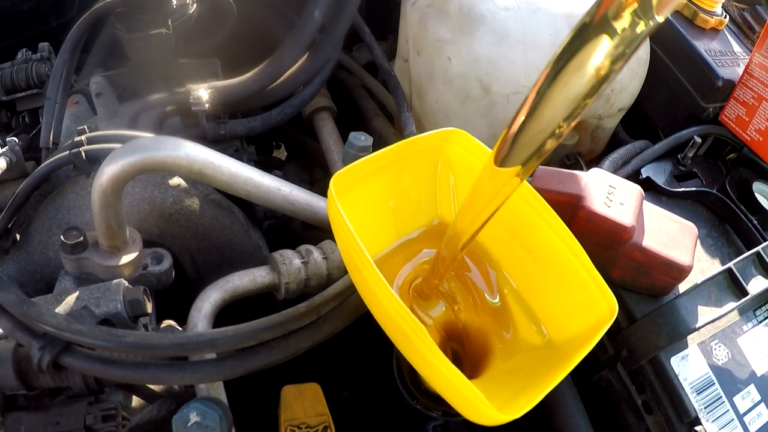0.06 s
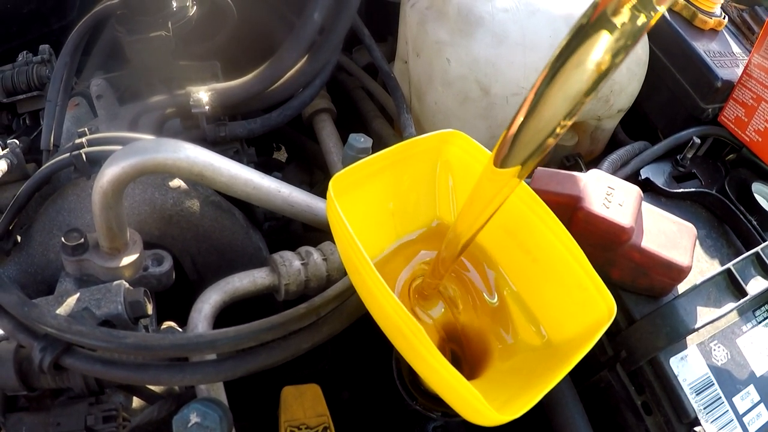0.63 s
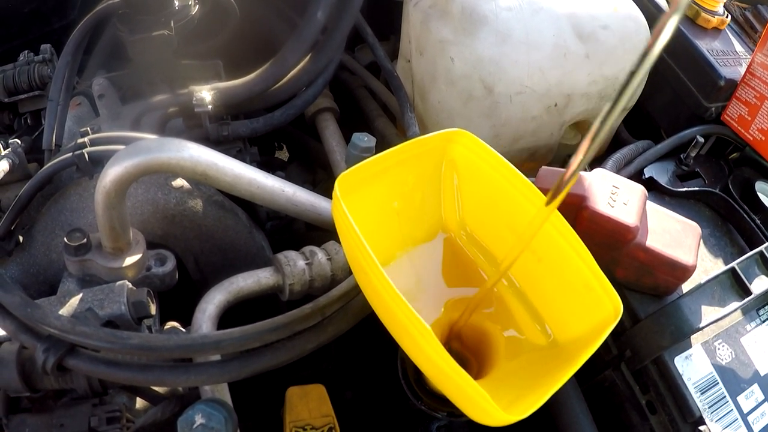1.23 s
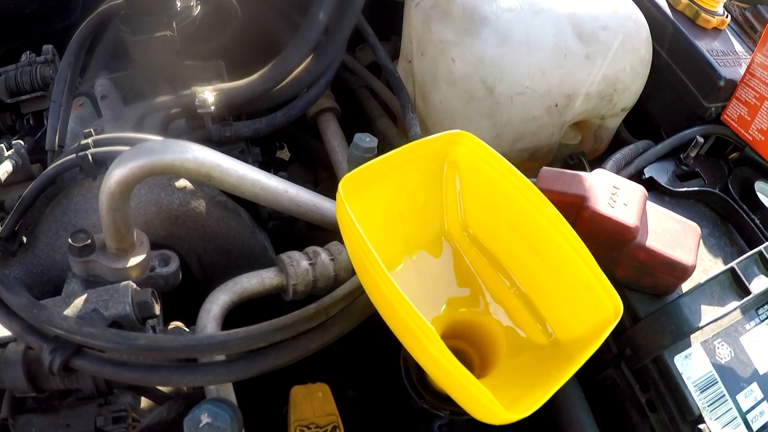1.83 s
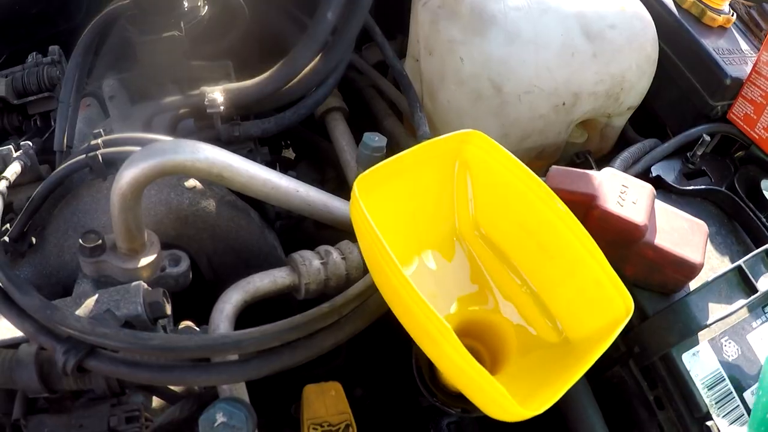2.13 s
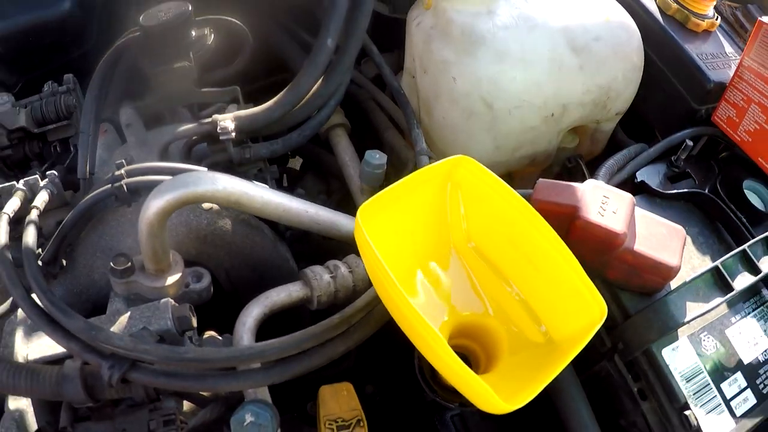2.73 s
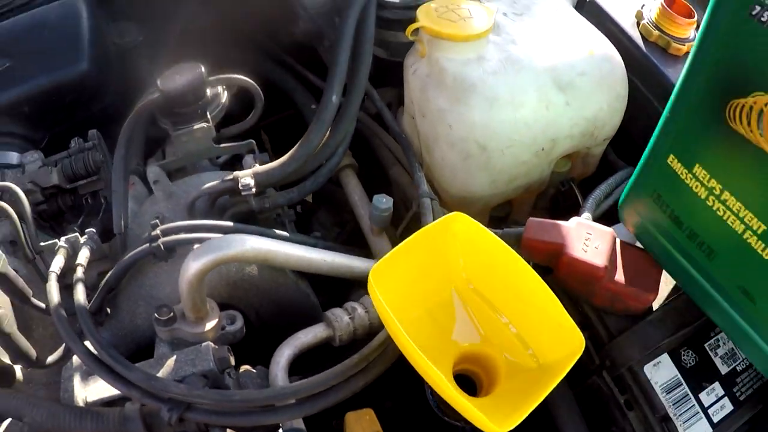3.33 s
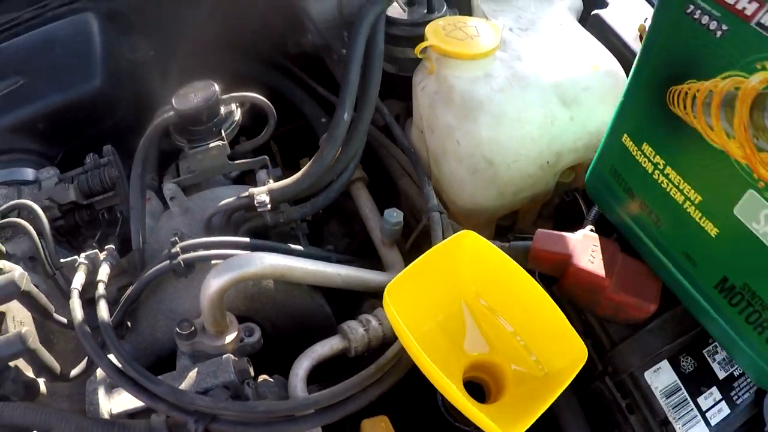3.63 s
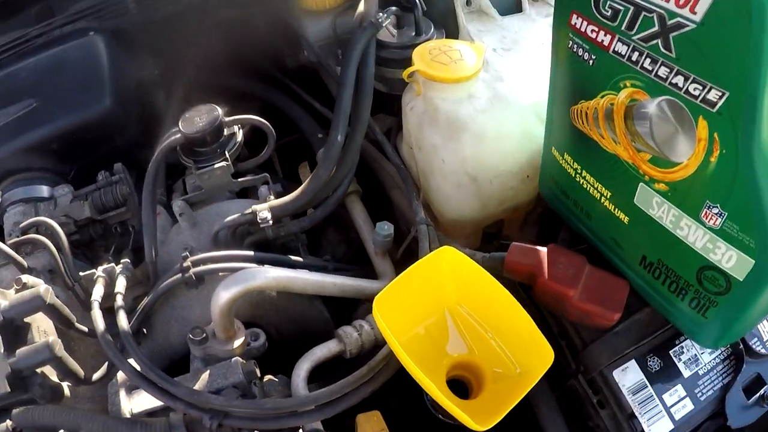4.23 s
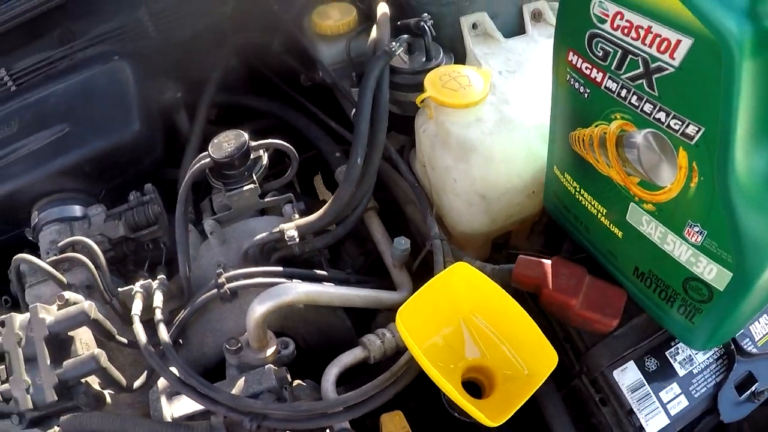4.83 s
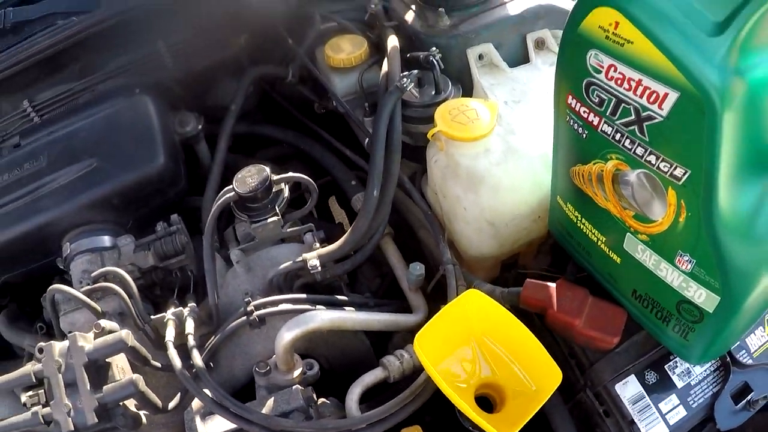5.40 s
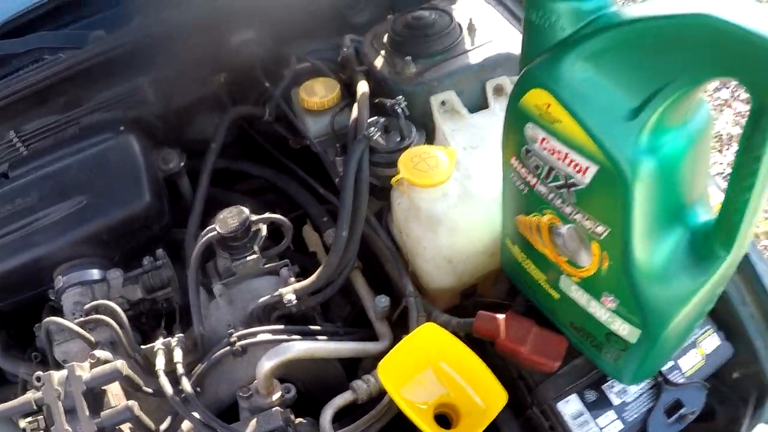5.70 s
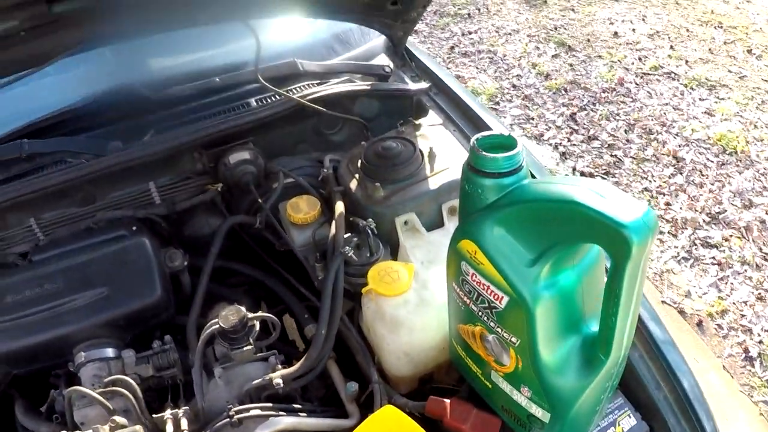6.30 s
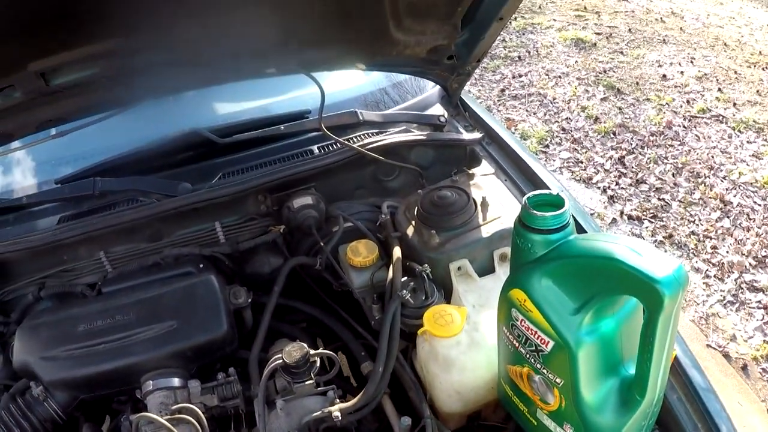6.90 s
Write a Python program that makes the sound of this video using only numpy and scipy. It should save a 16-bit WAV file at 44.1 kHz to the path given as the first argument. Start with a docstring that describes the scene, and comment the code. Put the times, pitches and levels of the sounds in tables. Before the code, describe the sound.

Faint oil gulps in a funnel, then a plastic jug is rustled and set down hollowly before fingers rub and pop against the microphone.

```python
"""Dry scuffs, a bump and a crinkle on a plastic jug over a hush of outdoor air; then three soft gulps
as the last motor oil swallows air in a funnel. A ribbed sleeve zips and rustles as the jug is lifted
away, knocked and stood on the engine with a hollow boom. Fingers thump the camera case, rub and smack
its microphone port and seal it between two pops. A low, swaying rumble fades in near the end."""
import sys
import numpy as np
from scipy import signal
from scipy.fft import rfft, irfft, next_fast_len
from scipy.io import wavfile

SR = 44100
rng = np.random.default_rng(int(sys.argv[2]) if len(sys.argv) > 2 else 0)


def wrap_up_sound(samples):
    """Save the sound to the file named by the first command line argument, as 16-bit audio."""
    columns = np.atleast_2d(samples).T
    # keep every value between -1 and 1, then stretch to whole-number steps
    tamed = np.clip(columns, -1, 1)
    steps = np.round(tamed * 32767).astype(np.int16)
    wavfile.write(sys.argv[1], SR, steps)


N = 315665
T = np.arange(N) / SR
BAND_EDGE_HZ = 15200


def gain_of(db):
    """Decibels to amplitude."""
    return 10 ** (np.asarray(db) / 20)


def unit_rms(x):
    """Scales to rms 1."""
    return x / np.sqrt(np.mean(x ** 2) + 1e-20)


def add(mix, at_s, sound):
    """Mixes a sound in, in place."""
    part = mix[max(round(at_s * SR), 0):][:len(sound)]
    part += sound[:len(part)]


def colour(x, spectrum, size=4096):
    """Minimum-phase filter; white noise keeps its power."""
    hz, db = np.transpose(spectrum)
    bins_hz = abs(np.fft.fftfreq(size, 1 / SR))
    log_gain = np.log(gain_of(np.interp(np.log(bins_hz + 1), np.log(hz + 1), db)))
    taps = np.fft.ifft(np.exp(np.conj(signal.hilbert(log_gain)))).real[:size // 2]
    return signal.oaconvolve(x, taps / np.linalg.norm(taps))[:len(x)]


def resonate(x, hz, width_hz):
    """One resonance, unity peak gain."""
    return signal.lfilter(*signal.iirpeak(hz, hz / width_hz, fs=SR), x)


def wander(rate_hz):
    """Smooth random drift, rms 1."""
    size = next_fast_len(N, real=True)
    rolloff = 1 + (np.fft.rfftfreq(size, 1 / SR) / rate_hz) ** 4
    return unit_rms(irfft(rfft(rng.standard_normal(size)) / rolloff, size)[:N])


def friction(grain_db, rate_hz):
    """Countless small slips in clumps, rms 1."""
    return unit_rms(rng.standard_normal(N) * gain_of(grain_db * np.clip(wander(rate_hz), -2, 2)))


def burst(t, swell_s):
    """A cluster of slips that peaks at swell_s and dies."""
    u = t / swell_s
    return (u * np.exp(1 - u)) ** 2 * rng.standard_normal(len(t))


def stroke(start_s, length_s, attack_s, release_s):
    """Trapezoid envelope; the release follows length_s."""
    rise = np.clip((T - start_s) / attack_s, 0, 1)
    return rise * np.clip(1 - (T - start_s - length_s) / release_s, 0, 1)


def scatter(start_s, length_s, per_s):
    """Loosely spaced times, each with a normal deviate clipped at 2."""
    gaps, deviates = rng.uniform(.3, 1.7, 64), np.clip(rng.standard_normal(64), -2, 2)
    offsets_s = (np.cumsum(gaps) - gaps[0] / 2) / per_s
    return [(start_s + s, deviate) for s, deviate in zip(offsets_s, deviates) if s < length_s]


def engine_bay(x, decay_s=0.0057, direct=0.72):
    """Hoses and metal return a tight cluster of echoes, new for each spot."""
    t = T[:SR // 50]
    taps = rng.standard_normal(len(t)) * np.exp(-t / decay_s)
    taps /= np.linalg.norm(taps)
    taps[0] += direct
    return signal.oaconvolve(x, taps / np.linalg.norm(taps))[:len(x)]


# still air (frequency [Hz], density [dB])
AIR_SPECTRUM = [(25, -21), (90, -29), (112, -30), (150, 1.5), (270, -6.5), (950, -10.5), (2000, -22),
                (4500, -30), (6500, -24), (8500, -31.5), (10500, -31.5), (13000, -40), (15500, -46)]
def air(level_db=-50.5):
    """Outdoor hush with a slight flutter."""
    return gain_of(level_db) * colour(friction(grain_db=1, rate_hz=24), AIR_SPECTRUM)


# thin-wall resonances (frequency [Hz], width [Hz], gain [dB])
WALL_MODES = [(2030, 420, -4.5), (3090, 49, -4), (4000, 67, -2), (4740, 54, 1.5)]
def plastic_wall(x):
    """Thin plastic adds narrow rings to whatever scrapes it."""
    return x + sum(gain_of(db) * resonate(x, hz, width_hz) for hz, width_hz, db in WALL_MODES)


# surface sizzle and the wall beneath (frequency [Hz], density [dB])
CRISP_SPECTRUM = [(1500, -22), (3500, -10), (5200, -5.5), (6000, 1.5), (6600, -3.5), (7600, -2.5),
                  (8200, -10), (10000, -13.5), (12000, -28.5), (15500, -66)]
DULL_SPECTRUM = [(200, -15), (450, 10), (680, -5), (950, 7.5), (1450, -9.5), (2100, -2), (2600, -10),
                 (3300, -9.5), (4000, -3.5), (5200, -9), (8000, -29.5)]
# slides on the jug (time [s], relative level [dB])
SCUFFS = [(0.025, -43.5), (.085, -42), (.103, -38.5), (.123, -41.5), (.315, -43), (0.366, -41), (.378, -42),
          (.434, -49.5), (.479, -50), (1.199, -50.5), (2.02, -45), (2.074, -47), (3.088, -36.5),
          (3.105, -33), (4.365, -44), (4.474, -42.5), (4.785, -42), (4.96, -38), (5.152, -41.5),
          (6.334, -38.5), (6.442, -36)]
def scuffs(crisp_db=-5, dull_db=-10, swell_s=0.0067):
    """Hand and sleeve slide briefly on dry plastic: broad sizzle, a little wall."""
    slips = np.zeros(N)
    for at_s, db in SCUFFS:
        add(slips, at_s, gain_of(db) * burst(T[:SR // 8], swell_s))
    crisp = gain_of(crisp_db) * colour(slips, CRISP_SPECTRUM)
    dull = gain_of(dull_db) * colour(engine_bay(slips), DULL_SPECTRUM)
    return plastic_wall(crisp + dull)


# jug wall modes (frequency [Hz], relative level [dB], t60 [s])
JUG_MODES = [(250, -4, 0.035), (320.5, -1.5, 0.086), (388, 1, 0.081), (500, -1, 0.047), (640, 0, 0.046),
             (828, 2, 0.06), (906, 4.5, 0.058), (1000, -2, 0.088), (1104, -1.5, 0.042), (1230, -4, 0.067),
             (1750, -5, 0.011), (2860, -11, 0.013)]
# blows (time [s], peak [dB], tilt [dB/octave], contact swell [s])
BUMPS = [(.056, -27, 4.5, 0.0014), (1.507, -37, 0, 0.0028), (2.947, -30, -8.5, 0.0029),
         (3.1, -21.5, -5, 0.0043), (3.115, -22.5, 0, 0.0018), (3.234, -30, 4.5, 0.0046),
         (3.344, -29.5, -2, 0.0027), (3.93, -25, 1.5, 0.003), (4.027, -24, 5, 0.011),
         (4.048, -19.5, -3.5, 0.0074)]
def jug_bumps(pivot_hz=700):
    """Scuffing blows ring the jug's walls; harder spots ring brighter."""
    out, t = np.zeros(N), T[:SR // 6]
    for at_s, db, tilt_db, contact_s in BUMPS:
        walls = np.zeros(len(t))
        for k, (hz, mode_db, t60_s) in enumerate(JUG_MODES):
            envelope = gain_of(mode_db + tilt_db * np.log2(hz / pivot_hz) - 60 * t / t60_s)
            walls += (-1) ** k * envelope * np.sin(2 * np.pi * hz * t)
        blow = signal.fftconvolve(burst(t, contact_s), walls)[:len(t)]
        add(out, at_s, gain_of(db) * blow / abs(blow).max())
    return out


# loudest snaps of sleeve and jug (time [s], relative level [dB], dull offset [dB])
CRINKLES = [(.057, -34, 1), (1.669, -40.5, 0.5), (1.866, -40, 2), (2.138, -34, -15), (2.614, -34.5, -7),
            (2.838, -35, -6), (2.947, -30, -8), (3.01, -33, -4.5), (3.043, -34.5, -4), (3.117, -41, 8.5),
            (3.22, -31.5, -11), (3.238, -30.5, -7), (3.311, -31.5, -14), (3.345, -36.5, 3),
            (3.527, -35, -7), (4.053, -32.5, 7.5), (4.219, -36, -2), (4.283, -45.5, 11.5),
            (4.392, -36.5, 3.5), (4.517, -40, -4), (4.642, -35.5, -7), (4.673, -35, 2), (4.746, -31.5, -4),
            (4.857, -39, 3), (4.893, -38.5, -1.5), (4.945, -30.5, -.5), (5.06, -32, -3),
            (5.115, -29.5, -.5), (6.13, -31, -0.5), (6.162, -32.5, 0.5), (6.308, -25, -8), (6.372, -37, -6),
            (6.426, -29.5, 1.5), (7.003, -26.5, -3)]
# one sleeve fold ticking on one note (time [s], relative level [dB])
FOLD_TICKS = [(2.489, -42), (2.552, -41), (2.585, -40.5), (2.66, -41), (2.694, -41), (2.729, -37),
              (2.755, -36.5), (2.78, -38)]
def crinkles(crisp_db=-7, dull_db=-5, snap_s=0.0032, fold_hz=6566, fold_width_hz=170, fold_db=9.5,
             swell_db=-15, swell_s=0.018, swell_lead_s=.01, snap_lead_s=0.001003,
             small_boost_db=8, tick_dull_db=-11):
    """Folds snap with a thin ring over a duller knock, each in a soft, brief swell of noise."""
    crisp, dull, t = np.zeros(N), np.zeros(N), T[:SR // 8]
    small = [(at_s, fizz_db + small_boost_db + jitter_db, offset_db)  # shed by each arm move
             for start_s, length_s, fizz_db, _, offset_db in ARM_MOVES
             for at_s, jitter_db in scatter(start_s, length_s, per_s=22)]
    snaps = [(at_s, db, tick_dull_db, snap_s, fold_hz) for at_s, db in FOLD_TICKS]
    for at_s, db, offset_db in CRINKLES + small:
        rise_s = snap_s * np.exp(.3 * rng.uniform(-1.2, 1))
        ring_hz = fold_hz * (1 + 0.066 * rng.uniform(-1.01, 1))
        snaps.append((at_s, db, offset_db, rise_s, ring_hz))
    for at_s, db, offset_db, rise_s, ring_hz in snaps:
        sizzle, knock = (engine_bay(burst(t, rise_s)) for _ in range(2))
        knock_hz = ring_hz * rng.uniform(.3, .7)
        sizzle += gain_of(fold_db) * resonate(sizzle, ring_hz, fold_width_hz)
        knock += gain_of(fold_db) * resonate(knock, knock_hz, fold_width_hz / 2)
        for layer, snap, layer_db in ((crisp, sizzle, crisp_db), (dull, knock, dull_db + offset_db)):
            add(layer, at_s - swell_lead_s, gain_of(db + layer_db + swell_db) * burst(t, swell_s))
            add(layer, at_s - snap_lead_s, gain_of(db + layer_db) * snap)
    return plastic_wall(colour(crisp, CRISP_SPECTRUM) + colour(dull, DULL_SPECTRUM))


# air pockets in the funnel neck (time [s], level [dB], start pitch [Hz])
GULPS = [(0.599, -50, 250), (0.934, -48, 196), (1.089, -43, 187)]
def oil_gulps(swell_s=0.0076, rise_per_s=1.9):
    """Thick oil swallows air: damped, slightly rising notes."""
    out, t = np.zeros(N), T[:SR // 6]
    envelope = t / swell_s * np.exp(1 - t / swell_s)
    for at_s, db, hz in GULPS:
        add(out, at_s, gain_of(db) * envelope * np.sin(2 * np.pi * hz * t * (1 + rise_per_s * t)))
    return out


# ribbed cloth (frequency [Hz], density [dB])
CLOTH_SPECTRUM = [(500, -13), (1050, 3.5), (4500, -2), (6000, 5.5), (7400, -0.5), (8300, -11.5),
                  (15000, -35)]
# slides (roughness [0-1], curve of (time [s], rib rate [Hz], relative level [dB]))
SLEEVE_SLIDES = [(.44, [(1.277, 880, -50.5), (1.342, 1110, -43.5), (1.363, 810, -47.5),
                 (1.385, 2200, -43.5), (1.398, 2760, -42), (1.412, 3200, -44)]), (.47, [(1.415, 880, -47),
                 (1.438, 1150, -43.5), (1.458, 1700, -47), (1.476, 3300, -44), (1.492, 3800, -52)]),
                 (0.86, [(1.492, 3000, -50.5), (1.545, 2900, -48), (1.572, 2500, -52)]),
                 (0.49, [(1.578, 4100, -57), (1.625, 6700, -60)])]
def sleeve_zip(trim_db=-1, overtone_db=-2, squeak_hz=5900, squeak_db=-2):
    """Cloth ribs flick past each other: a ragged whistle that follows speed, plus fibre hiss."""
    out, waver = np.zeros(N), 1 + .045 * wander(300)
    catching = unit_rms(gain_of(2.1 * wander(260)))
    for roughness, curve in SLEEVE_SLIDES:
        times_s, rate_hz, db = np.transpose(curve)
        on = (T > times_s[0]) & (T < times_s[-1])
        pitch_hz = np.interp(T[on], times_s, rate_hz) * waver[on]
        phase = 2 * np.pi * np.cumsum(pitch_hz) / SR
        ribs = sum(gain_of(overtone_db * (k > 2)) * np.cos(k * phase) * (k * pitch_hz < BAND_EDGE_HZ)
                   for k in range(1, 15))
        ribs *= np.sqrt(2 * pitch_hz / BAND_EDGE_HZ)  # near-equal power at any speed
        slide = np.sqrt(1 - roughness) * ribs + np.sqrt(roughness) * rng.standard_normal(N)[on]
        out[on] += gain_of(np.interp(T[on], times_s, db) + trim_db) * catching[on] * slide
    squeak = gain_of(squeak_db) * resonate(out, squeak_hz, width_hz=260)
    return colour(out + squeak, CLOTH_SPECTRUM)


# hollow jug (frequency [Hz], density [dB])
BODY_SPECTRUM = [(90, -25), (155, 9), (260, -4), (430, -2), (700, -9), (930, -3), (1300, -17.5),
                 (2000, -17), (3500, -24.5), (7000, -44)]
# arm carrying the jug (start [s], length [s], relative fizz [dB], relative body [dB], dull offset [dB])
ARM_MOVES = [(1.871, 0.15, -51.5, -51, -4.5), (2.479, 0.5, -54, -49.5, -10), (2.97, 0.54, -50, -41.5, -8),
             (3.567, 0.09, -46, -34.5, -8), (3.859, 0.07, -55.5, -39.5, 1),
             (4.347, 0.26, -53.5, -49.5, -0.5), (4.658, 0.502, -51.5, -50.5, 0),
             (5.191, 0.19, -54.5, -50.5, 1), (6.781, 0.34, -55, -77, -12)]
def rustle(fizz_db=-7, scrape_db=-7, body_db=-3):
    """The sleeve drags in gritty clumps; the hollow jug scrapes in the hand."""
    fizz, scrape, body = np.zeros((3, N))
    for start_s, length_s, sleeve_db, jug_db, offset_db in ARM_MOVES:
        effort = stroke(start_s, length_s, attack_s=0.024, release_s=0.084)
        fizz += gain_of(sleeve_db + fizz_db) * effort
        scrape += gain_of(sleeve_db + offset_db + scrape_db) * effort
        body += gain_of(jug_db + body_db) * effort
    slips = friction(grain_db=5.5, rate_hz=85)
    sleeve = colour(fizz * slips, CRISP_SPECTRUM) + colour(scrape * slips, DULL_SPECTRUM)
    hollow = body * colour(friction(grain_db=3.9, rate_hz=63), BODY_SPECTRUM)
    return engine_bay(plastic_wall(sleeve) + hollow)


# fingers on the case (time [s], relative level [dB], settled pitch [Hz])
THUMPS = [(2.605, -33, 380), (4.211, -24.5, 178), (4.563, -29, 267), (5.1, -29, 168), (5.158, -26.5, 251.6),
          (5.235, -30.5, 176), (5.271, -32, 230), (5.823, -34.5, 175), (5.908, -26.5, 249),
          (6.088, -6.5, 175), (6.125, -21, 206), (6.288, -24.5, 158), (7.149, -26.5, 250)]
def finger_thumps(trim_db=2, overshoot=1.28, sag_s=0.00088, firm_cycles=0.62, light_touch_db=-36,
                  fidget_s=(5.84, 6.5), tap_db=-31, tap_spread_db=3, tap_hz=168):
    """A push swings the case; pitch sags and firmer pushes die sooner. Fidgeting adds light taps."""
    out, t = np.zeros(N), T[:SR // 16]
    taps = [(at_s, tap_db + tap_spread_db * deviate, tap_hz)
            for at_s, deviate in scatter(fidget_s[0], fidget_s[1] - fidget_s[0], per_s=16)]
    for at_s, db, hz in THUMPS + taps:
        decay_cycles = firm_cycles + gain_of(light_touch_db - db)
        phase = 2 * np.pi * hz * (t + overshoot * sag_s * (1 - np.exp(-t / sag_s)))
        add(out, at_s, -gain_of(db + trim_db) * np.exp(-t * hz / decay_cycles) * np.sin(phase))
    return out


# modes of the jug's air and broad sides (frequency [Hz], relative level [dB], t60 [s])
BOOM_MODES = [(185.3, 0.5, 0.23), (216.5, -1, 0.31), (253, -3, 0.14), (379, -12, 0.064)]
def jug_landing(at_s=4.054, db=-21, swell_s=0.017, scuff_db=-9, scuff_s=0.01):
    """The jug lands with an uneven, damped boom while its base scuffs."""
    out, t = np.zeros(N), T[:SR // 3]
    boom = sum(gain_of(mode_db - 60 * t / t60_s) * np.sin(2 * np.pi * hz * t)
               for hz, mode_db, t60_s in BOOM_MODES)
    rocking = gain_of(2 * wander(110)[:len(t)])
    add(out, at_s, gain_of(db) * (1 - np.exp(-t / swell_s)) * rocking * boom)
    add(out, at_s, gain_of(db + scuff_db) * colour(burst(t, scuff_s), BODY_SPECTRUM))
    return out


# touched port cavity and sliding skin (frequency [Hz], density [dB])
PORT_SPECTRUM = [(100, -17.5), (170, 4.5), (400, -9.5), (680, -13), (900, -1), (1120, 1), (1450, -7.5),
                 (2000, 1.5), (2650, -3.5), (3200, -14.5), (4200, -26), (15000, -58)]
SKIN_HISS_SPECTRUM = [(2500, -15), (4200, -4.5), (5300, -5), (6400, 2.5), (7600, -6.5), (8300, -11),
                      (10500, -14.5), (15000, -37)]
# strokes over the port (start [s], length [s], attack [s], level [dB], hiss offset [dB])
RUBS = [(5.905, 0.043, 0.0028, -35.5, -19), (5.944, 0.14, 0.02, -32.5, -15),
        (6.085, 0.041, 0.02, -38.5, -12.5), (6.139, 0.04, 0.013, -32, -18.5),
        (6.184, 0.048, 0.014, -38.5, -14), (6.237, 0.29, 0.025, -47, -11.5),
        (6.507, 0.116, 0.039, -28.5, -17.5), (6.731, 0.038, 0.023, -36, -15),
        (6.825, 0.03, 0.015, -33.5, -14.5)]
def port_rubs():
    """Skin hisses across the microphone port; its cavity rings at 1-3 kHz."""
    pressure, hiss = np.zeros((2, N))
    for start_s, length_s, attack_s, db, hiss_db in RUBS:
        push = gain_of(db) * stroke(start_s, length_s, attack_s, release_s=0.018)
        pressure += push
        hiss += gain_of(hiss_db) * push
    cavity = colour(friction(grain_db=1.6, rate_hz=150), PORT_SPECTRUM)
    waver = gain_of(1.3 * wander(25))
    return waver * pressure * cavity + hiss * colour(rng.standard_normal(N), SKIN_HISS_SPECTRUM)


# skin impacts (time [s], impulse level before filtering [dB])
SMACKS = [(5.9082, -11.5), (6.6251, -3)]
def port_smacks():
    """Skin meets the port all at once: a sharp crack of its cavity."""
    impulses = np.zeros(N)
    for at_s, db in SMACKS:
        impulses[round(at_s * SR)] = gain_of(db)
    return colour(impulses, PORT_SPECTRUM)


# low rumble (frequency [Hz], density [dB])
RUMBLE_SPECTRUM = [(25, 2.5), (60, 3.5), (100, -8), (200, -14.5), (500, -55)]
def low_rumble(start_s=6.06, rise_s=0.37, level_db=-44.5, sway_db=4):
    """A low, swaying rumble fades in near the end."""
    envelope = np.clip((T - start_s) / rise_s, 0, 1) * gain_of(level_db + sway_db * wander(8.7))
    return envelope * colour(rng.standard_normal(N), RUMBLE_SPECTRUM)


def pop(t, db, start_hz, end_hz, sag_s, decay_s, attack_s):
    """Trapped air pushes on the microphone and rocks ever more slowly."""
    turns = end_hz * t + (start_hz - end_hz) * sag_s * (1 - np.exp(-t / sag_s))
    return gain_of(db) * (1 - np.exp(-t / attack_s)) * np.exp(-t / decay_s) * np.sin(2 * np.pi * turns)


def sealed_port(sound, shut_s=6.6255, freed_s=6.721, clear_s=6.752, muffle_db=-9,
                judder_hz=140, judder_db=-7, swell_s=0.0097):
    """A fingertip judders onto the port, pops it shut, ducks all sound and pops free."""
    covered = np.interp(T, [shut_s, shut_s + 0.0055, clear_s - .02, clear_s], [0, 1, 1, 0])
    out, t = sound * gain_of(muffle_db * covered), T[:SR // 8]
    judder = gain_of(judder_db) * np.exp(-t / swell_s) * np.sin(2 * np.pi * judder_hz * t)
    add(out, shut_s - t[-1], judder[::-1])  # reversed: swells into the seal
    add(out, shut_s, -pop(t, db=-4, start_hz=385, end_hz=50, sag_s=.0024, decay_s=.012, attack_s=.0001))
    release = pop(t, db=-11.5, start_hz=105, end_hz=16, sag_s=.0038, decay_s=.017, attack_s=.00063)
    add(out, freed_s, release)
    return out


def scene(low_cut_hz=114):
    """All sources at one microphone; air, port contact and rumble bypass the bass cut."""
    full_band = air() + port_rubs() + low_rumble() + port_smacks()
    handling = (oil_gulps() + rustle() + sleeve_zip() + jug_bumps() + jug_landing()
                + finger_thumps() + crinkles() + scuffs())
    low_cut = signal.butter(5, low_cut_hz, "high", fs=SR, output="sos")
    return sealed_port(full_band + signal.sosfiltfilt(low_cut, handling))[None]


def record(dry, ceiling=.52):
    """Soft overload on the loudest pops, then the band limit."""
    rounded = dry / (1 + (dry / ceiling) ** 4) ** .25
    low_pass = signal.firwin(511, BAND_EDGE_HZ, window=("kaiser", 9), fs=SR)
    return signal.oaconvolve(rounded, low_pass[None], "same")


dry = scene()
out = record(dry)
wrap_up_sound(out)
```